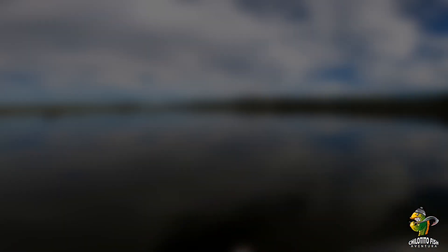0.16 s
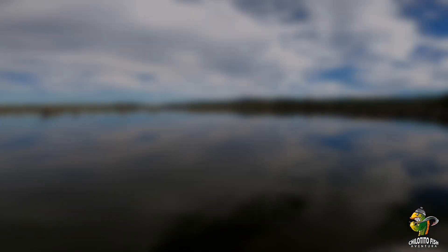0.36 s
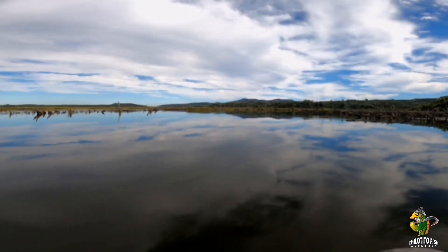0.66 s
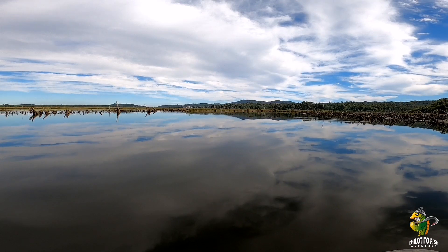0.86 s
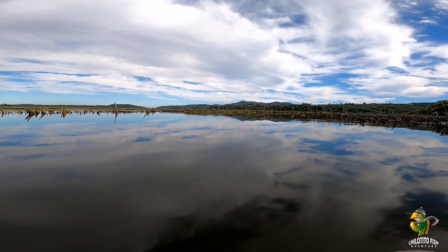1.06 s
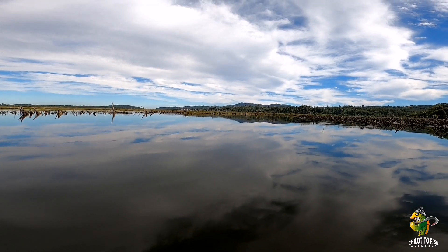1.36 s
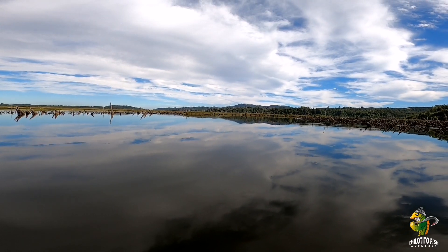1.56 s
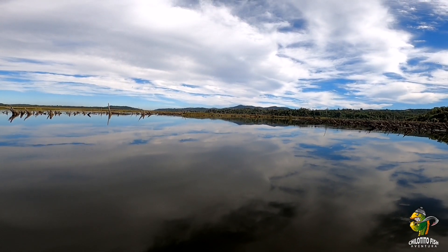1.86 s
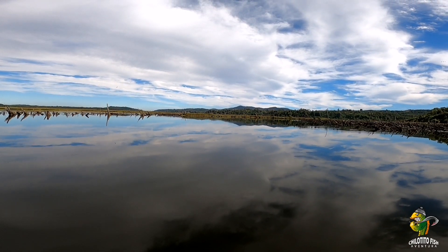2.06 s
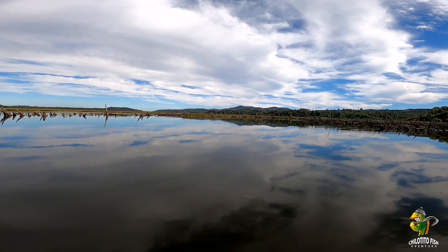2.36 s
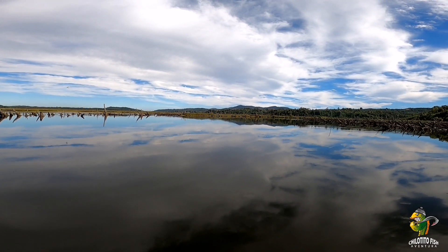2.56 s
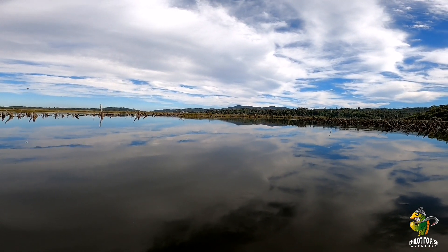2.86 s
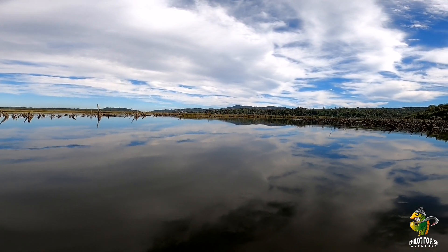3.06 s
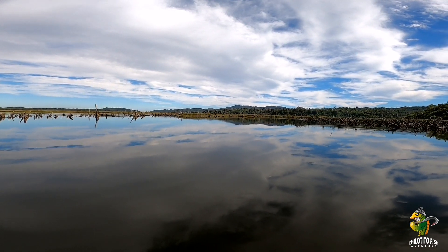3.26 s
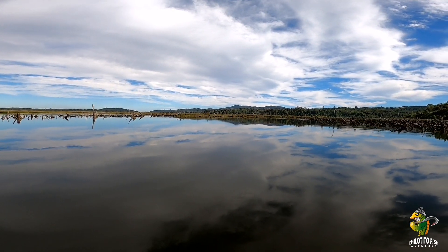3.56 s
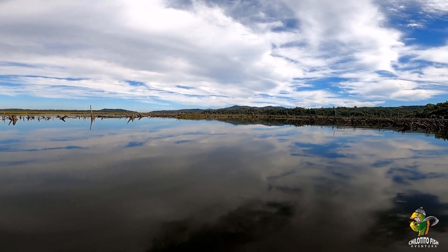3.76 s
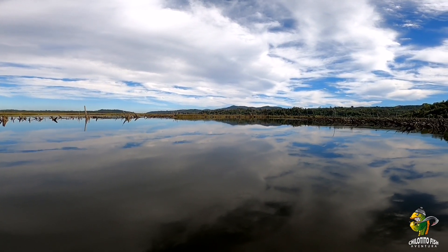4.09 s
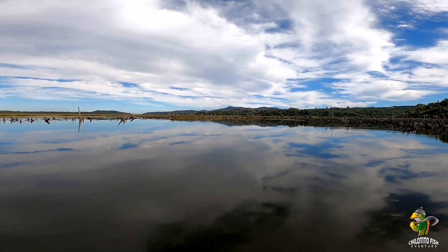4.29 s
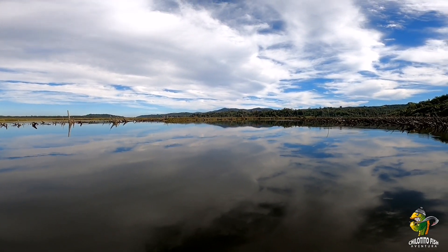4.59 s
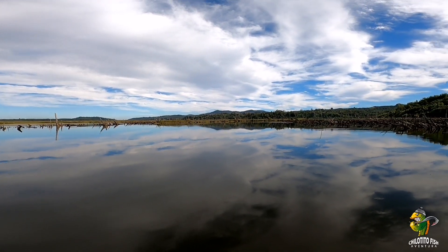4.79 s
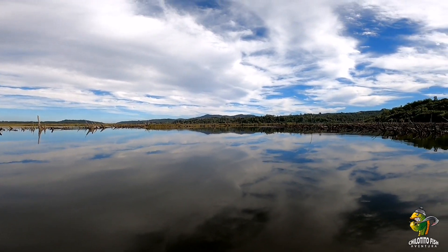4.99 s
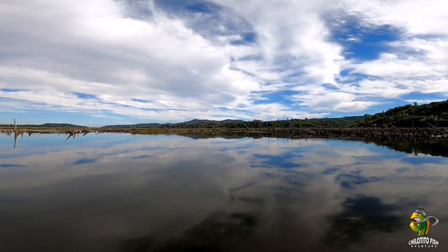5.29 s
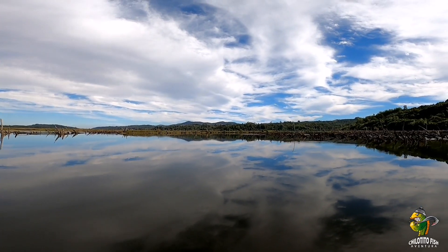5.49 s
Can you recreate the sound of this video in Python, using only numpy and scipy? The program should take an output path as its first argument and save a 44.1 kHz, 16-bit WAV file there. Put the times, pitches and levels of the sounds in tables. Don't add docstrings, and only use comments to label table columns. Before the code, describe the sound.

Continuous mid-low engine hum with a rough, breathy roar and thin gear whine, from a boat motor close to a small camera. The start is loud and mono, soon turned down by automatic gain. Brief misfires roughen the tone and a deep drone gradually joins underneath. Late on, the sound becomes brighter, more metallic and wider, with soft bumps from hands on the camera housing. Outdoors, with no obvious room echo.

```python
import sys
import numpy as np
from scipy import signal
from scipy.fft import rfft, irfft, next_fast_len
from scipy.io import wavfile
from scipy.ndimage import uniform_filter1d, map_coordinates

SR = 44100
rng = np.random.default_rng(int(sys.argv[2]) if len(sys.argv) > 2 else 0)


def persist_wave(psi):
    counts = np.round(np.clip(psi, -1, 1) * 32767).astype(np.int16)
    wavfile.write(sys.argv[1], SR, np.atleast_2d(counts).T)


def rack_gain(trim_db):
    fader = np.asarray(trim_db, float)
    return 10 ** (fader / 20)


N = 248724
NOMINAL_HZ = 210
SETTLED_DB = -31.5

# t/s, f/Hz
FIRING_RATE = [
    (0.1, 210.4),
    (1.51, 209.1),
    (1.68, 211.5),
    (1.86, 209),
    (2.83, 209.2),
    (3.15, 209.6),
    (5.6, 210.8),
]
# t/s, length/s, half-rate level under the hum/dB
MISSES = [(0.135, 0.014, -6), (0.202, 0.015, 0), (0.438, 0.035, -4), (0.511, 0.021, -4.5),
          (0.575, 0.06, -2), (0.781, 0.023, -4.5), (1.155, 0.1, -2), (1.497, 0.022, -15.5),
          (1.861, 0.03, -7.5), (1.997, 0.049, -1.5), (2.038, 0.026, -4.5), (2.203, 0.02, -4),
          (2.275, 0.018, -8.5), (2.336, 0.025, 2), (2.39, 0.018, -11), (2.413, 0.12, -2),
          (2.872, 0.032, -3.5), (3.989, 0.021, -18.5), (4.563, 0.02, -3.5), (4.752, 0.04, -3),
          (4.909, 0.029, -12.5), (5.521, 0.029, -4), (5.595, 0.048, -7)]
# f/Hz, level/dB
EXHAUST_TONE = [(8, -56.5), (25, -14), (52, -10.5), (78, 2), (105, 4), (157, 3.5), (185, 5), (210, 0),
                (262, 3.5), (290, -8), (315, -7), (345, -16), (420, -30), (640, -45), (2000, -110)]
CYLINDER_OFFSETS = [0.19, 0.012, -0.087, -0.039, 0.039, 0.083, -0.16, 0.09]
# f/Hz, density/dB per Hz
ROAR_TONE = [(160, -42), (280, -7), (458, -5.5), (508, -6.5), (624, -6.5), (723, -3.5), (802, -9.5),
             (921, -7), (1260, -11), (2200, -24), (2860, -57.5), (4840, -120)]
# f/Hz, density/dB per Hz
CLATTER_TONE = [(820, -27), (1400, -6.5), (1760, -2), (1870, -3.5), (2140, -8.5), (2530, -3), (3290, -8),
                (3990, -12), (6600, -25.5), (8600, -31), (11500, -41.5), (15000, -64.5), (22000, -120)]
# f/Hz, density/dB per Hz
PANEL_TONE = [(1500, -120), (2250, -36), (2430, -2.5), (2490, 0.5), (2560, -11), (2800, -46.5),
              (4000, -120)]
# f/Hz, strength [ratio]
HULL_ECHO = [(200, 0.65), (1000, 0.4), (2500, .55), (3500, 0.28), (6000, .05)]
# t/s, width/s, roar level/dB, clatter level/dB, panel level/dB
SWELLS = [(.56, 0.072, 1.5, 1.2, 0), (.67, 0.038, -1, 1, 5), (1.3, .2, -1, 0.5, 2.5),
          (1.78, .15, -0.2, -0.1, -7), (2.24, 0.087, 1, 2, 7.5), (2.57, 0.093, 0.2, 0.5, 13.5),
          (2.749, .06, 1.2, -1.3, 1), (2.96, 0.058, 2.3, -3, 9), (3.2, 0.02, 2.5, -2, 4),
          (3.6, 0.24, -.3, -1, 0), (4.5, 0.051, 0.6, -0.5, 9)]
# f/Hz, level/dB
UNSETTLED_TONE = [(300, 3), (420, -6), (520, 3.5), (700, -1), (1050, 2), (1500, 0.3)]
# f/Hz, unsteadiness/Hz, level above the roar/dB
GEAR_LINES = [(420, 5, -16), (575, 8, -17.5), (681.4, 3, -9), (813.6, 4.3, -8.5), (967, 3, -13),
              (1140, 9.2, -22), (1224, 4.5, -10), (1268, 8, -13), (1507, 10, -24), (1838, 9, -20.5),
              (2253, 11, -24.5)]
# f/Hz, density/dB per Hz
RUMBLE_TONE = [(15, -23.5), (30, -9), (55, -8), (78, -3), (105, -14), (130, -6.5), (158, 2.5), (185, 3),
               (240, -3), (290, -19.5), (500, -60.5), (900, -120)]
# f/Hz, level/dB
FACING_TONE = [(250, -0.5), (450, -2.5), (900, 0), (1250, 3), (1700, -2), (2300, 4), (3200, -1),
               (5000, -1.5)]
# t/s, level/dB, f/Hz
KNOCKS = [
    (.32, -33, 420),
    (2.28, -50, 306),
    (3.395, -44.5, 407.4),
]
# t/s, level/dB, f/Hz
TAPS = [
    (4.468, -39, 796),
    (4.497, -34, 900),
]
# t/s, level/dB, f/Hz
HANDLING = [(.26, -53, 90.6), (2.14, -49, 120.6), (3.74, -71, 150), (3.82, -69, 60), (3.92, -52, 198.9),
            (4.06, -67, 60), (4.17, -76, 100), (4.285, -66, 178.7), (4.38, -40.5, 110), (4.49, -35, 120),
            (4.755, -36.5, 109.7), (4.88, -45, 100), (4.96, -42, 100), (5.05, -44, 100.2),
            (5.245, -41, 100), (5.5, -39, 100), (5.555, -39, 100), (5.61, -37, 110.1)]
# f/Hz, side level/dB
LEFT_LEAN = [(60, -25.5), (200, -26), (400, -26.5), (700, -15.5), (1300, -13), (2400, -7), (4400, -12),
             (8000, -18)]
# f/Hz, level/dB
DIFFUSE_SIDE = [(60, -22.5), (200, -40.5), (400, -17.5), (1300, -17.5), (2400, -10), (4400, -0.5),
                (8000, -2), (15000, -2)]
# t/s, side level/dB
STEREO_WIDTH = [
    (0, -69.5),
    (3.45, -73),
    (3.6, -22),
    (3.8, -11),
    (4.3, -4),
    (5.0, -0.3),
    (5.64, 2.5),
]
# f/Hz, density/dB per Hz
HISS_TONE = [(3000, -19), (10500, -10), (12500, -0.5), (14500, -1.5), (15600, -12)]


def unit(x):
    return x / np.sqrt(np.mean(x ** 2) + 1e-20)


def along(points, hz):
    f, v = np.transpose(points)
    return np.interp(np.log(hz + 1), np.log(f + 1), v)


def curve(rows):
    s, value = np.transpose(rows)
    return np.interp(np.arange(N) / SR, s, value)


def ramp(t, start, takes):
    return np.clip((t - start) / takes, 0, 1)


def wobble(rate):
    return map_coordinates(rng.standard_normal(4000), [np.arange(N) * rate / SR])


def filtered(x, response):
    m = next_fast_len(N + SR // 2)
    return irfft(rfft(x, m) * response(np.fft.rfftfreq(m, 1 / SR)), m)[:N]


def coloured(x, tone):
    return filtered(x, lambda hz: rack_gain(along(tone, hz)))


def rush(tone, patchy_db):
    z = signal.stft(rng.standard_normal(N), nperseg=512)[2]
    field = uniform_filter1d(rng.standard_normal(z.shape), size=5, axis=0)
    field = uniform_filter1d(field, size=8, axis=1)
    noise = signal.istft(z * rack_gain(patchy_db * unit(field)), nperseg=512)[1][:N]
    return unit(coloured(noise, tone))


def exhaust(firings, hum_db, scatter, miss_lag, uneven_lag):
    at = np.flatnonzero(np.diff(np.floor(firings))) + 1
    count = np.floor(firings[at]).astype(int)
    uneven = np.take(CYLINDER_OFFSETS, count % 8) * (1 + 0.47 * wobble(9)[at])
    uneven = uneven + scatter * rng.standard_normal(N)[:len(at)]
    limp = np.zeros(len(at))
    for s, length, db in MISSES:
        inside = np.abs(at / SR - s - length / 2) < length / 2 + .004
        limp[inside] = rack_gain(db - 7.0) * (-1.) ** (count[inside] - count[inside][:1])
    late = (firings[at] - count) / (firings[at] - firings[at - 1])
    pulses = 0
    for strength, lag in ((1, 0), (uneven, uneven_lag), (limp, miss_lag)):
        train = np.zeros(N)
        train[at] = strength * (1 - late)
        train[at - 1] = strength * late
        pulses = pulses + filtered(train, lambda hz: rack_gain(along(EXHAUST_TONE, hz)) * np.exp(-1j * lag))
    return rack_gain(hum_db) * pulses * SR / NOMINAL_HZ / np.sqrt(2)


def hull_bounce(x):
    delay_s = .0048

    def response(hz):
        echo = along(HULL_ECHO, hz)
        return (1 + echo * np.exp(-2j * np.pi * hz * delay_s)) / np.sqrt(1 + echo ** 2)

    return filtered(x, response)


def cowling(firings, roar_db, clatter_db, ring_db):
    throb_db = 1.1 * np.cos(2 * np.pi * firings / 4)
    shared_db = 0.38 * wobble(11) + 0.6 * wobble(35)
    roar = rack_gain(roar_db - 0.8 + shared_db + throb_db) * rush(ROAR_TONE, patchy_db=0.44)
    clatter_db = roar_db + clatter_db + 7 + shared_db + 0.27 * wobble(6.3) + throb_db / 2
    clatter = rack_gain(clatter_db) * rush(CLATTER_TONE, patchy_db=1.43)
    ring_db = roar_db + ring_db - 6 + shared_db + throb_db + 0.85 * wobble(40)
    ring = rack_gain(ring_db) * rush(PANEL_TONE, patchy_db=-0.7)
    return hull_bounce(roar + clatter) + ring


def gears(firings, roar_db):
    lines = 0
    for hz, unsteady_hz, db in GEAR_LINES:
        turns = firings * hz / NOMINAL_HZ + np.cumsum(unsteady_hz * wobble(45)) / SR
        lines = lines + rack_gain(db + 2.2 * wobble(12)) * np.sin(2 * np.pi * turns)
    return rack_gain(roar_db) * lines


def hull_drone(firings, level_db, t):
    drone_db = level_db - 29.5 + 6 * ramp(t, 0.36, 2.1) + 3 * wobble(7)
    return rack_gain(drone_db) * np.sqrt(2) * np.sin(2 * np.pi * firings / 4)


def hull_rumble(level_db, early):
    return rack_gain(level_db - 13.5 - 2 * early + 3.1 * wobble(11.0)) * rush(RUMBLE_TONE, patchy_db=-0.5)


def recorder_gain_db(t):
    since = np.maximum(t - 0.22, 0)
    return 2 * np.exp(-since / 0.049) + 14.5 * np.exp(-since / .6)


def engine():
    t = np.arange(N) / SR
    firings = np.cumsum(curve(FIRING_RATE) + 0.84 * wobble(14)) / SR
    level_db = SETTLED_DB + recorder_gain_db(t)
    missing = sum(rack_gain(db) * (np.abs(t - s - length / 2) < length / 2) for s, length, db in MISSES)
    hum_db = level_db - 2.5 * uniform_filter1d(missing, size=600)

    masked_db = 4.2
    early = 1 - ramp(t, 0.72, 0.14)
    turned = ramp(t, 3.91, .99)
    swells_db = sum(np.outer(db, np.exp(-.5 * ((t - s) / width) ** 2)) for s, width, *db in SWELLS)
    roar_db = level_db - 14 + masked_db / 2 * early + 1.36 * turned + swells_db[0]
    clatter_db = -17 - masked_db * early + 2.5 * turned + swells_db[1]
    ring_db = -17.5 - 2.1 * early + 4.5 * turned + swells_db[2]

    casing = cowling(firings, roar_db, clatter_db, ring_db)
    casing = casing + gears(firings, roar_db - masked_db / 2 * early)
    unsettled = 1 - ramp(t, 0.17, .15)
    casing = casing + unsettled * (coloured(casing, UNSETTLED_TONE) - casing)
    hull = hull_drone(firings, level_db, t) + hull_rumble(level_db, early)
    hum = exhaust(firings, hum_db + 0.53 * wobble(19), scatter=0.03, miss_lag=-0.65, uneven_lag=0.69)
    fade = ramp(t, 0.034, 0.085) ** 2.3
    fade *= np.clip((N - np.arange(N)) / (.006 * SR), 0, 1)
    return fade * (hum + hull + casing)


def thuds(events, length, puff_db):
    out = np.zeros(N + SR)
    t = np.arange(SR // 20) / SR
    bump = np.sin(np.pi * np.clip(t / length, 0, 1)) ** 2
    for s, db, hz in events:
        lowpass = signal.butter(3, 8 * min(hz, 200), fs=SR)
        puff = unit(signal.lfilter(*lowpass, rng.standard_normal(len(t))))
        push = np.sin(2 * np.pi * hz * t) + rack_gain(puff_db) * puff
        out[round((s - length / 2) * SR):][:len(t)] += rack_gain(db) * push * bump
    return out[:N]


def stereo_side(mid):
    hz, _, z = signal.stft(mid, SR, nperseg=1024)
    scrambled = np.abs(z) * np.exp(2j * np.pi * rng.random(z.shape)) * rack_gain(along(DIFFUSE_SIDE, hz))[:, None]
    diffuse = signal.istft(scrambled, SR, nperseg=1024)[1][:N]
    wide = coloured(mid, LEFT_LEAN) + diffuse
    bass = filtered(wide, lambda hz: 1 / (1 + (hz / 330) ** 8))
    treble_db = curve(STEREO_WIDTH)
    bass_db = treble_db - 25 + 26.5 * ramp(np.arange(N) / SR, 4.33, .07)
    return rack_gain(treble_db) * (wide - bass) + rack_gain(bass_db) * bass


def hiss():
    noise = rack_gain(-89.0) * np.array([rush(HISS_TONE, patchy_db=-0.5), rush(HISS_TONE, patchy_db=-1.0)])
    return noise * ramp(np.arange(N) / SR, .05, .2)


def scene():
    mid = engine() + thuds(KNOCKS, length=0.012, puff_db=-1.5) + thuds(TAPS, length=0.0059, puff_db=-8)
    turned = ramp(np.arange(N) / SR, 3.91, .99)
    mid = mid + turned * (coloured(mid, FACING_TONE) - mid)
    side = stereo_side(mid) + thuds(HANDLING, length=.024, puff_db=-8.5)
    return np.array([mid + side, mid - side])


def band_limit(x):
    return signal.sosfilt(signal.butter(12, 15610, fs=SR, output="sos"), x)


def record(dry):
    mix = dry + hiss()
    return band_limit(mix)


dry = scene()
out = record(dry)
persist_wave(out)
```